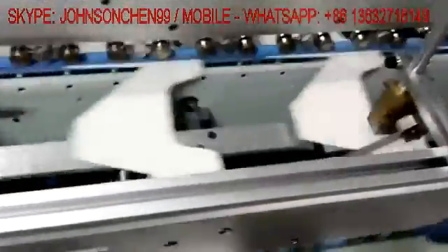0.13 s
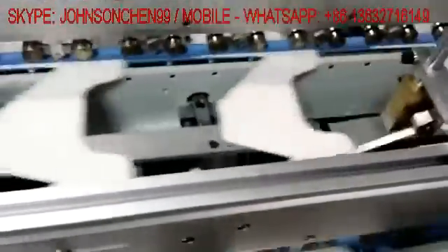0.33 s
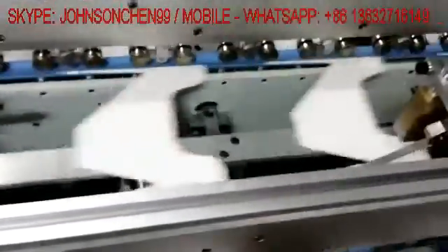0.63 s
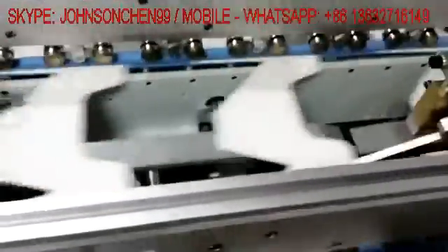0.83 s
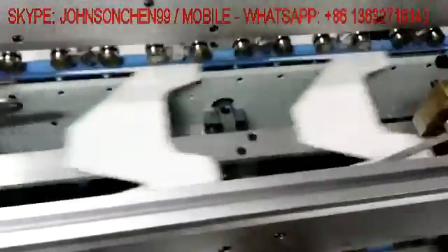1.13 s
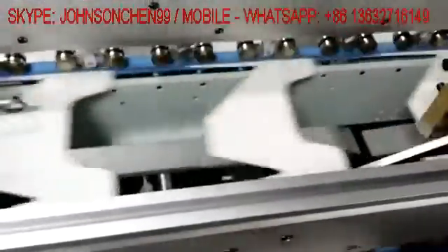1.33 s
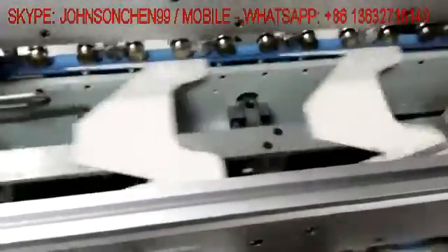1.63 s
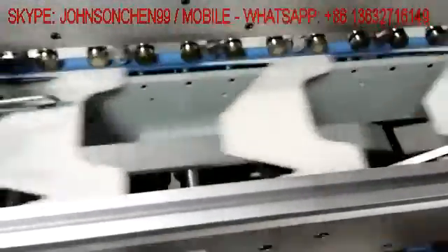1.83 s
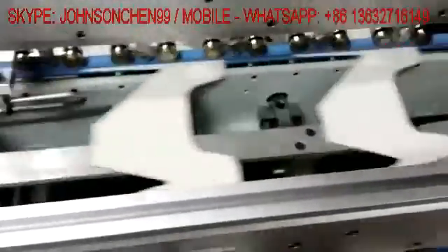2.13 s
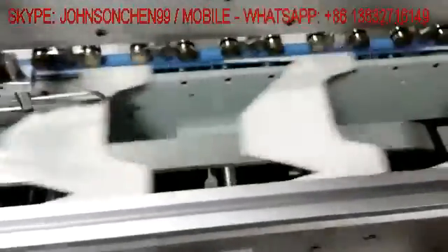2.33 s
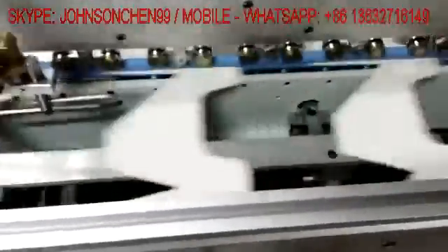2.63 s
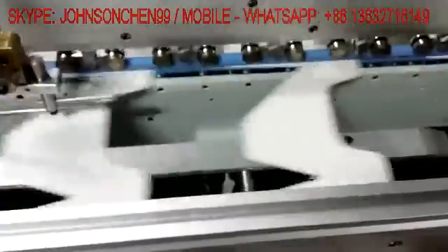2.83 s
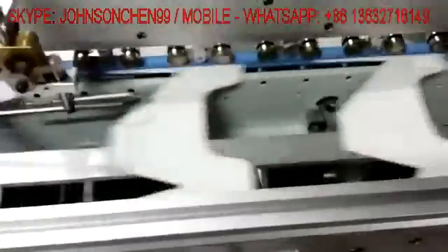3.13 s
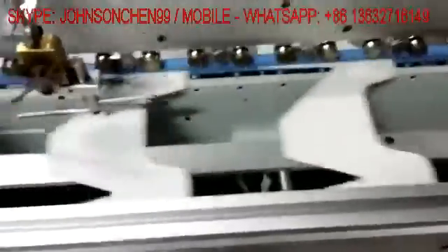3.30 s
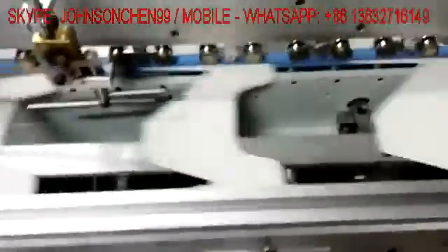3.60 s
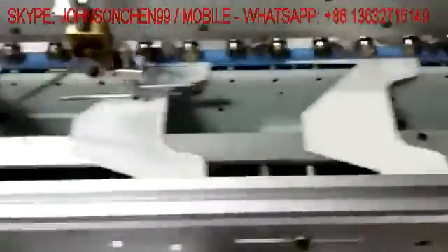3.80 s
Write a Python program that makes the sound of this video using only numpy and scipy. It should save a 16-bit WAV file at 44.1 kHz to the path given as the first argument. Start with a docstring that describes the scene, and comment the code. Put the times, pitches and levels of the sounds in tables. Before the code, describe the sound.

Close to a folder gluer, bright metallic clangs with air bursts repeat about twice a second, each followed by jingling, ticks and a papery scrape, while motor and belts roar steadily in a factory.

```python
"""Motor hum and belt roar open a factory scene, a card knocks, then a steel arm clangs close by.
For each carton blank an air valve hisses, the arm rattles out and the rollers jingle; a latch ticks
and card scrapes along the rails. Noise and random impacts drive these sounds, many through ringing modes;
the motor is wavering sines. A limiter ducks the whole mix around its loudest moments."""
import sys
import numpy as np
from scipy import signal
from scipy.fft import rfft, irfft
from scipy.io import wavfile
from scipy.ndimage import uniform_filter1d, minimum_filter1d

SR = 44100
rng = np.random.default_rng(int(sys.argv[2]) if len(sys.argv) > 2 else 0)


def boost_factor(decibels):
    """Convert a level in decibels to a linear amplitude factor."""
    exponent = np.asarray(decibels, float) / 20
    return 10 ** exponent


def put_to_file(sound):
    """Save the sound as 16-bit audio at rate SR, in the file named by the first command-line argument."""
    columns = np.atleast_2d(sound).T  # one column per channel
    safe = np.clip(columns, -1, 1)
    whole_steps = np.round(safe * 32767)
    wavfile.write(sys.argv[1], SR, whole_steps.astype(np.int16))


N = 174636

# All levels in the source tables are relative; each layer's gains add to them.
# Motor hum lines: (frequency [Hz], level [dB])
HUM_LINES = [(86, -38), (129.2, -30), (172, -37), (258.4, -32.5)]
# Belt roar spectrum: (frequency [Hz], density [dB per Hz])
ROAR_SPECTRUM = [(12, -43), (20, -18.5), (136, -3), (462, -5.5), (627, -4), (783, -6.5), (1610, -6.5),
                 (2130, -7), (3140, -17.5), (4150, -17), (4510, -12), (6300, -17.5), (7440, -18.5),
                 (13700, -35.5), (15300, -34)]
# Low rumble swelling near the end: (time [s], level [dB])
RUMBLE_LEVELS = [(3.3, -42), (3.494, -10.5), (3.532, -17.5), (3.686, -20), (3.706, -14), (3.746, -9.5),
                 (3.784, -28), (3.836, -12.5), (3.876, -23), (3.96, -12)]
# Microphones panning along the machine: (time [s], drone level [dB], left minus right [dB])
PAN_MOVES = [(0, 0, -0.5), (.7, -1, 0), (1.5, -1, -0.5), (2.3, 2.4, 0), (3, 1.5, -0.5), (3.4, 1, 0),
             (3.6, 1.5, 0), (3.96, 2.5, 0.5)]
# Short treble puffs: (start [s], level [dB], length [s])
TREBLE_PUFFS = [(2.325, -23, 0.06), (1.86, -25, 0.01)]
# Card scrapes: (loudest moment [s], level [dB])
CARD_SCRAPES = [(.34, -14), (.8, -14), (1.282, -14), (1.768, -12), (2.23, -12), (2.689, -12.5), (3.15, -12),
                (3.608, -12.5)]
# Modes heard in the scrape: (frequency [Hz], width [Hz], level [dB])
SCRAPE_MODES = [(1207, 76, -4.5), (1440, 120, -1), (1719, 76, 1)]
# Card knocks between the clangs: (time [s], level [dB], centre [Hz])
CARD_KNOCKS = [(0.021, -8, 395), (0.45, -9, 657), (0.853, -7.5, 1020), (1.817, -13, 627), (1.847, -11, 690),
               (2.203, -8, 1440), (2.28, -5, 627), (2.736, -10.5, 950), (3.029, -7, 1280),
               (3.111, -16, 1680), (3.198, -16.5, 600), (3.662, -12, 587)]
# Ticks of small parts: (time [s], level [dB], centre [Hz])
PART_TICKS = [(0.4518, -12.5, 4400), (0.844, -13, 7100), (0.872, -13, 6030), (0.941, -22, 9000),
              (1.3037, -15, 7500), (1.332, -11, 6500), (1.7035, -11, 4810), (1.7582, -13, 7500),
              (1.7866, -10, 6240), (2.236, -9, 6130), (2.278, -6.5, 4700), (2.6219, -15, 4690),
              (2.675, -12, 7440), (2.779, -13, 5900), (3.679, -12, 5300)]
# Latch ticks: (time [s], level [dB])
LATCH_TICKS = [(0.309, -8), (0.7636, -10), (1.2226, -13), (1.6731, -9), (2.1331, -6), (2.598, -8),
               (3.056, -9.5), (3.5206, -12)]
# Modes of latch and small parts: (frequency [Hz], width before TICK_SPREAD [Hz], level [dB])
TICK_MODES = [(2000, 200, 4), (3400, 900, -3), (4800, 700, 0), (6500, 1400, -7), (8500, 1200, -3),
              (10800, 1800, -12), (13500, 1500, -21)]
# Machine strokes: (air valve opens [s], level [dB], late jingle [dB], delay of the arm [s])
STROKES = [(0.0747, -1.5, -12, 0.02), (0.534, -1.5, -12, 0.017), (.992, -2, -6.5, 0.015),
           (1.468, -2, -5, 0.0011), (1.924, -1, -2.5, 0.0011), (2.385, 1, -2.5, .001),
           (2.8286, -1.5, 0, 0.00061), (3.2891, -1.5, 0, 0.0007), (3.754, 0, -2.5, 0.00063)]
# Roller modes: (frequency [Hz], width before ROLLER_SPREAD [Hz], level [dB])
ROLLER_MODES = [(3390, 35, -13), (3740, 25, -9), (4150, 27, -10), (4410, 33, -3), (4630, 30, -1),
                (4890, 30, -6), (5140, 31, -1), (5500, 32, -6), (5910, 42, 0), (6720, 33, -3),
                (7450, 57, -1), (7820, 30, -5), (7950, 18, -5), (8820, 40, -6), (9060, 51, -8),
                (9360, 56, -7), (10100, 41, -9), (10500, 35, -8), (11200, 42, -10), (11500, 44, -9),
                (12600, 34, -12), (13570, 50, -13)]
# Air hiss spectrum: (frequency [Hz], density [dB per Hz])
AIR_SPECTRUM = [(1470, -30), (3200, -13.5), (4900, -7), (5800, -3.5), (6310, -7), (7340, -4), (13700, -10),
                (14500, -90), (15300, -81)]
# Steel arm modes: (frequency [Hz], width before ARM_SPREAD [Hz], level [dB])
ARM_MODES = [(4250, 120, -13), (5960, 100, -4), (6780, 55, -15), (7130, 30, -10), (7430, 61, 0),
             (7950, 30, -10), (8830, 20, -14), (9060, 33, -8), (9350, 46, -5), (10500, 32, -15),
             (11200, 34, -9), (11500, 42, -9), (13550, 110, -10)]
# Stereo likeness: (frequency [Hz], left-right likeness [-1 to 1])
STEREO_LIKENESS = [(30, 0.75), (60, 0.18), (110, 0.49), (200, 0.66), (380, 0.81), (700, 0.39),
                   (1280, -0.31), (2370, 0.17), (3500, 0.58), (4370, 0.94), (8060, 0.98), (14900, 1)]
# Stereo lean: (frequency [Hz], left minus right [dB])
STEREO_LEAN = [(60, -3), (125, -2.6), (250, -5), (500, -7), (1200, -9.5), (2300, -7.5), (3750, -3),
               (7470, -3.5), (14900, -4.2)]

HUM_WAVER_DB, HUM_WAVER_HZ, HUM_SLIP_S = 3, 14, 0.0006  # rms level drift, its fastest rate, rms time drift
ROAR_DB, ROAR_PATCH_DB, ROAR_SWELL_DB = -16, 1.8, 1.1
RUMBLE_HZ, RUMBLE_WIDTH_HZ = 181, 193
PUFF_HZ, PUFF_WIDTH_HZ = 10000, 7000
SCRAPE_RISE_S, SCRAPE_FALL_S, SCRAPE_GRAINS_PER_S = 0.045, 0.05, 1500
RUB_DB, RUB_HZ, RUB_WIDTH_HZ = -5, 2010, 580
SHUFFLE_AFTER_S, SHUFFLE_S, SHUFFLE_DB, SHUFFLE_HZ, SHUFFLE_WIDTH_HZ = 0.079, 0.061, -5.5, 594, 1030
KNOCK_T60_S, KNOCK_WIDTH_HZ, KNOCK_GAIN_DB = 0.056, 1070, -1
SMALL_T60_S, SMALL_WIDTH_HZ, SMALL_GAIN_DB, SMALL_CRACK_DB = 0.029, 1700, -3, 13
TICK_T60_S, TICK_GAIN_DB, CRACK_DB, TICK_SPREAD = 0.035, -6, 25, 0.8
BOUNCE_S, BOUNCE_DB = 0.0058, -5
JINGLE_RISE_S, JINGLE_FALL_DB_PER_S, JINGLE_HITS_PER_S, JINGLE_IDLE_DB = 0.071, 100, 1500, -31
JINGLE_PATCH_DB, ROLLER_SPREAD = 2.8, 0.85
RAIL_HZ, RAIL_WIDTH_HZ, RAIL_DB = 2010, 26.4, -17
AIR_DB, AIR_HOLD_S, AIR_FALL_DB_PER_S = -13.5, 0.042, 89
ARM_GAIN_DB, ARM_FALL_DB_PER_S, ARM_HITS_PER_S, ARM_SPREAD = -4, 170, 2800, 1.5
STRIKE_DB = 17  # the single first blow above the rattle
CONTACT_S = 0.0003  # softens the onset of every ringing body
LOW_HZ, TOP_HZ = 44.3, 14480  # edges of the microphones' range
LIMIT_DB, SQUEEZE, WINDOW_S = -5, 0.64, 0.017  # SQUEEZE: dB of cut per dB over the limit
PEAK_FALL_DB_PER_S = 30  # how fast the held peak reading sinks


def evened(x):
    """Scales to rms 1."""
    return x / np.sqrt(np.mean(x ** 2) + 1e-20)


def read(points, hz):
    """Reads a table on a log-frequency axis."""
    f, value = np.transpose(points)
    return np.interp(np.log(hz + 1), np.log(f + 1), value)


def noise():
    """Two unrelated white noises."""
    return rng.standard_normal((2, N))


def colour(x, spectrum):
    """Gives x a spectrum, rms 1."""
    gain = boost_factor(read(spectrum, np.fft.rfftfreq(N, 1 / SR)))
    return evened(irfft(rfft(x) * gain, N))


def band(x, hz, width):
    """A bell-shaped band of x around hz, rms 1; width is the half-width at 1/e amplitude."""
    n = x.shape[1]
    bell = np.exp(-((np.fft.rfftfreq(n, 1 / SR) - hz) / width) ** 2)
    return evened(irfft(rfft(x) * bell, n))


def grains(per_s, spread_db):
    """Random small impacts of uneven size and either sign, rms 1."""
    size = boost_factor(spread_db * np.minimum(rng.exponential(1, (2, N)), 4))
    size = size * rng.choice([-1, 1], (2, N))
    return evened(size * (rng.random((2, N)) < per_s / SR))


def ring(x, modes, spread):
    """Passes impacts through decaying modes of a body; wider modes die faster. Unit-energy response."""
    t = np.arange(SR // 4) / SR
    body = np.zeros(len(t))
    for hz, width, db in modes:
        width = np.clip(width * spread, 5, 2000)
        body += boost_factor(db) * width * np.exp(-np.pi * width * t) * np.sin(2 * np.pi * hz * t)
    body *= 1 - np.exp(-t / CONTACT_S)
    return signal.oaconvolve(x, body[None] / np.linalg.norm(body), axes=1)[:, :N]


def after(s):
    """Time since s, and a switch that is on from then."""
    t = np.arange(N) / SR - s
    return np.maximum(t, 0), t >= 0


def slow(top_hz, low_hz=0.301):
    """Slow random drift of rms 1, a sum of sines weaker towards the fast end."""
    t = np.arange(N) / SR
    rates = np.geomspace(low_hz, top_hz, num=16)
    return evened(sum(np.sin(2 * np.pi * (f * t + rng.random())) / np.sqrt(f) for f in rates))


def patchy(x, depth_db):
    """Lets drifting patches of the spectrum swell and sink."""
    z = signal.stft(x, nperseg=512, noverlap=384)[2]
    patches = uniform_filter1d(rng.standard_normal(z.shape[1:]), size=6, axis=0)
    patches = evened(uniform_filter1d(patches, size=12, axis=1))
    return signal.istft(z * boost_factor(depth_db * patches), nperseg=512, noverlap=384)[1][:, :N]


def motor_hum():
    """Steady motor lines whose level and phase waver."""
    t = np.arange(N) / SR
    hum = np.zeros(N)
    for hz, db in HUM_LINES:
        level = np.sqrt(2) * boost_factor(db + HUM_WAVER_DB * slow(HUM_WAVER_HZ, 1.487))
        slipping_t = t + HUM_SLIP_S * slow(HUM_WAVER_HZ, 0.98)
        hum += level * np.sin(2 * np.pi * hz * slipping_t)
    return hum * [[1], [0.6]]


def belt_roar():
    """Broad coloured noise with a patchy spectrum and a slow swell."""
    roar = evened(patchy(colour(noise(), ROAR_SPECTRUM), ROAR_PATCH_DB))
    return boost_factor(ROAR_DB + ROAR_SWELL_DB * slow(5.25)) * roar


def rumble():
    """Low-banded impacts swelling near the end."""
    s, db = np.transpose(RUMBLE_LEVELS)
    level = boost_factor(np.interp(np.arange(N) / SR, s, db, left=-90))
    return level * band(grains(500, 2.0), RUMBLE_HZ, RUMBLE_WIDTH_HZ)


def drone():
    """Hum and roar change level as the microphones pan; the rumble lies over them."""
    s, near_db, _ = np.transpose(PAN_MOVES)
    nearness = boost_factor(np.interp(np.arange(N) / SR, s, near_db))
    return nearness * (motor_hum() + belt_roar()) + rumble()


def puffs():
    """Brief gated hisses high in the treble."""
    t = np.arange(N) / SR
    gate = np.zeros(N)
    for s, db, length in TREBLE_PUFFS:
        gate += boost_factor(db) * np.clip(np.minimum(t - s, s + length - t) / 0.0048, 0, 1)  # 4.8 ms ramps
    return gate * band(noise(), PUFF_HZ, PUFF_WIDTH_HZ)


def scrapes():
    """Card rubs through the rails in a swell of grains, then shuffles lower."""
    t, rub, shuffle = np.arange(N) / SR, np.zeros(N), np.zeros(N)
    for s, db in CARD_SCRAPES:
        rub += boost_factor(db) * np.exp(-((t - s) / np.where(t < s, SCRAPE_RISE_S, SCRAPE_FALL_S)) ** 2)
        shuffle += boost_factor(db + SHUFFLE_DB) * np.exp(-((t - s - SHUFFLE_AFTER_S) / SHUFFLE_S) ** 2)
    ringing = ring(rub * grains(SCRAPE_GRAINS_PER_S, 1.7), SCRAPE_MODES, 1.0)
    rubbing = rub * boost_factor(RUB_DB) * band(grains(900, 2.9), RUB_HZ, RUB_WIDTH_HZ)
    shuffling = shuffle * band(grains(1000, 1.0), SHUFFLE_HZ, SHUFFLE_WIDTH_HZ)
    return ringing + rubbing + shuffling


def noise_taps(rows, width, t60, gain_db):
    """Short decaying bands of noise, one for each row of (time, level, centre)."""
    out, t = np.zeros((2, N + 4096)), np.arange(4096) / SR
    for s, db, hz in rows:
        at = round(s * SR)
        tap = band(rng.standard_normal((2, len(t))), hz, width)
        out[:, at:at + 4096] += boost_factor(db + gain_db - 60 * t / t60) * tap
    return out[:, :N]


def card_knocks():
    """Card knocks between the clangs: low, broad noise taps."""
    return noise_taps(CARD_KNOCKS, KNOCK_WIDTH_HZ, KNOCK_T60_S, KNOCK_GAIN_DB)


def small_ticks():
    """Small parts tick: a noise tap with an impulse ringing the tick modes."""
    crack = np.zeros((1, N))
    for s, db, _ in PART_TICKS:
        crack[0, round(s * SR)] = boost_factor(db + SMALL_CRACK_DB)
    taps = noise_taps(PART_TICKS, SMALL_WIDTH_HZ, SMALL_T60_S, SMALL_GAIN_DB)
    return taps + ring(np.repeat(crack, 2, axis=0), TICK_MODES, TICK_SPREAD)


def latch():
    """The latch cracks and bounces once, each impulse with a decaying puff of noise through its modes."""
    puff, crack, t = np.zeros(N), np.zeros(N), np.arange(4096) / SR
    for s, db in LATCH_TICKS:
        for late, drop_db in ((0, 0), (BOUNCE_S, BOUNCE_DB)):
            at = round((s + late) * SR)
            level_db = db + TICK_GAIN_DB + drop_db
            puff[at:at + 4096] += boost_factor(level_db - 60 * t / TICK_T60_S)
            crack[at + SR // 2000] = boost_factor(level_db + CRACK_DB)  # just after the puff starts
    return ring(crack + puff * noise(), TICK_MODES, TICK_SPREAD)


def roller_jingle():
    """After each stroke, many small hits ring rollers and rail, building up and fading."""
    power = np.full(N, boost_factor(2 * JINGLE_IDLE_DB))
    for s, db, late_db, delay in STROKES:
        t, _ = after(s + delay)
        rise = np.minimum(t / JINGLE_RISE_S, 1) ** 2
        power += (rise * boost_factor(db + late_db - JINGLE_FALL_DB_PER_S * t)) ** 2
    shake = np.sqrt(power) * grains(JINGLE_HITS_PER_S, 2.45)
    rail = boost_factor(RAIL_DB) * ring(shake, [(RAIL_HZ, RAIL_WIDTH_HZ, 0)], 1.0)
    return patchy(ring(shake, ROLLER_MODES, ROLLER_SPREAD) + rail, JINGLE_PATCH_DB)


def air_hiss():
    """Each valve lets out coloured noise that opens fast, holds, then decays."""
    level = np.zeros(N)
    for s, db, _, delay in STROKES:
        t, _ = after(s)
        opening = np.minimum(t / (0.0014 + delay / 4), 1)
        level += opening * boost_factor(db + AIR_DB - AIR_FALL_DB_PER_S * np.maximum(t - AIR_HOLD_S, 0))
    return level * colour(noise(), AIR_SPECTRUM)


def steel_arm():
    """One strong blow and a decaying rattle of hits ring the arm's modes."""
    rattle, blow = np.zeros(N), np.zeros(N)
    for s, db, _, delay in STROKES:
        t, _ = after(s + delay)
        onset = np.minimum(t / (0.00093 + delay / 4), 1)
        rattle += onset * boost_factor(db + ARM_GAIN_DB - ARM_FALL_DB_PER_S * t)
        blow[round((s + delay) * SR)] = boost_factor(db + ARM_GAIN_DB + STRIKE_DB)
    return ring(blow + rattle * grains(ARM_HITS_PER_S, 4.0), ARM_MODES, ARM_SPREAD)


def scene():
    """Each source comes as two versions; the microphones share the first and differ by the second."""
    background = drone() + puffs()
    card_and_latch = scrapes() + card_knocks() + small_ticks() + latch()
    clangs = roller_jingle() + air_hiss() + steel_arm()
    shared, apart = rfft(background + card_and_latch + clangs)
    hz = np.fft.rfftfreq(N, 1 / SR)
    same = np.clip(read(STEREO_LIKENESS, hz), -0.999, 0.999)
    lean = boost_factor(read(STEREO_LEAN, hz) / 2)
    left = shared * lean
    right = (same * shared + np.sqrt(1 - same ** 2) * apart) / lean
    edges = 1 / np.sqrt((1 + (LOW_HZ / (hz + 1)) ** 4) * (1 + (hz / TOP_HZ) ** 240))
    pair = irfft(edges * np.array([left, right]), N)
    s, _, turn_db = np.transpose(PAN_MOVES)
    return pair * boost_factor(np.interp(np.arange(N) / SR, s, turn_db) * [[0.5], [-0.5]])


def roll_off(x):
    """The treble ends steeply here."""
    return signal.sosfilt(signal.butter(12, 15470, fs=SR, output="sos"), x)


def record(dry):
    """A look-ahead limiter turns both channels down just before peaks and recovers steadily."""
    peak_db = 20 * np.log10(abs(dry).max(0) + 1e-9)
    fall, window = np.arange(N) * PEAK_FALL_DB_PER_S / SR, int(WINDOW_S * SR)
    held_db = np.maximum.accumulate(peak_db + fall) - fall
    over_db = np.maximum(held_db - LIMIT_DB, 0)
    widened_db = -minimum_filter1d(-over_db, window)
    over_db = uniform_filter1d(widened_db, window, origin=-(window // 2))  # averages what is to come
    limited = np.clip(dry * boost_factor(-SQUEEZE * over_db), -1, 1)
    return roll_off(limited)


dry = scene()
out = record(dry)
put_to_file(out)
```